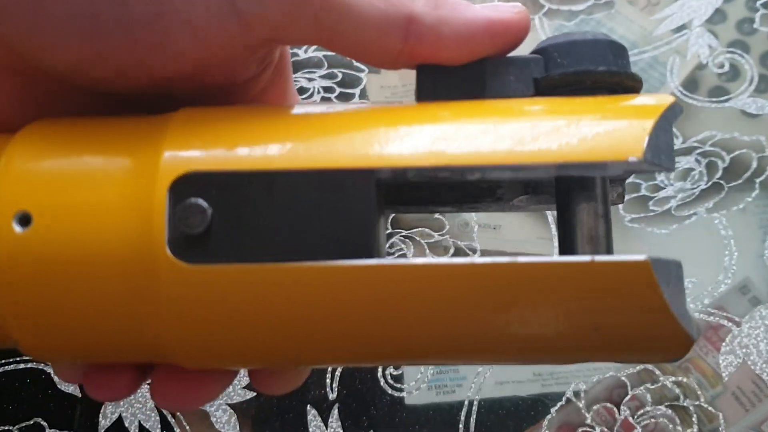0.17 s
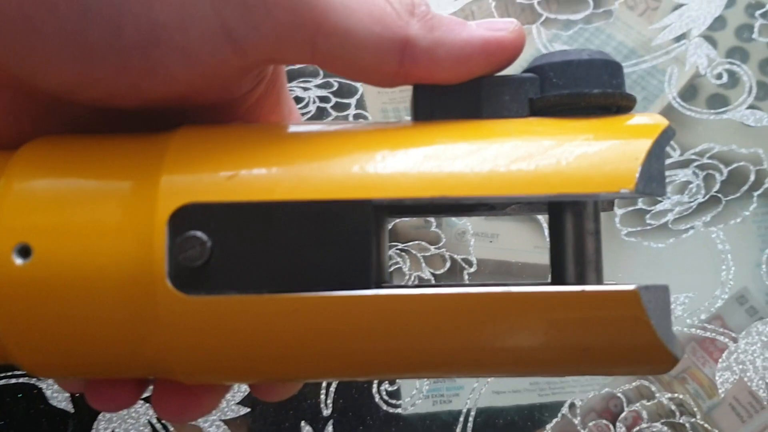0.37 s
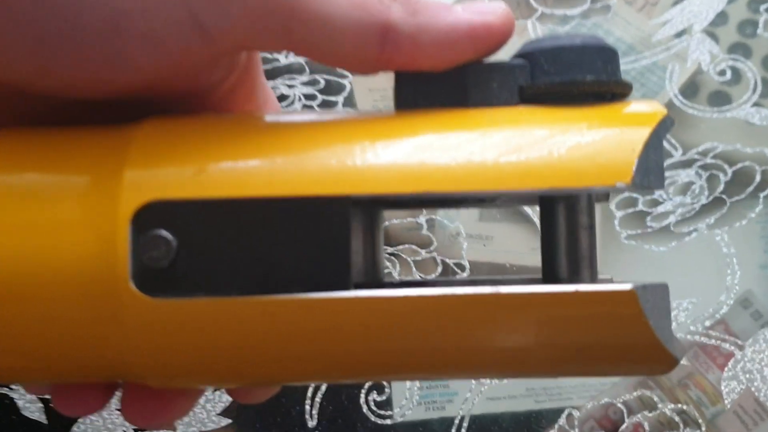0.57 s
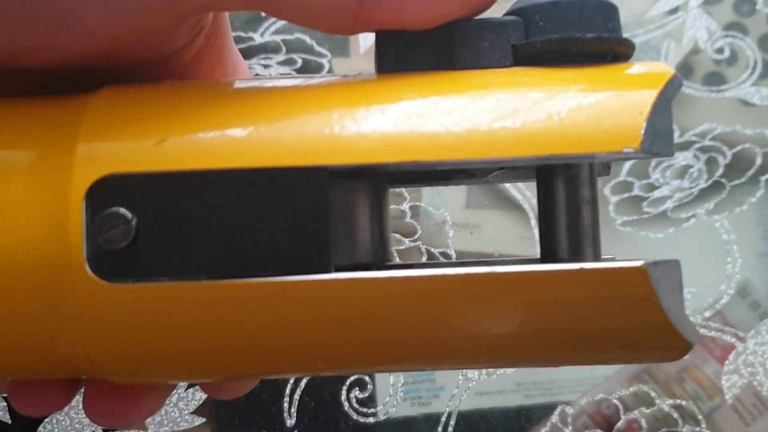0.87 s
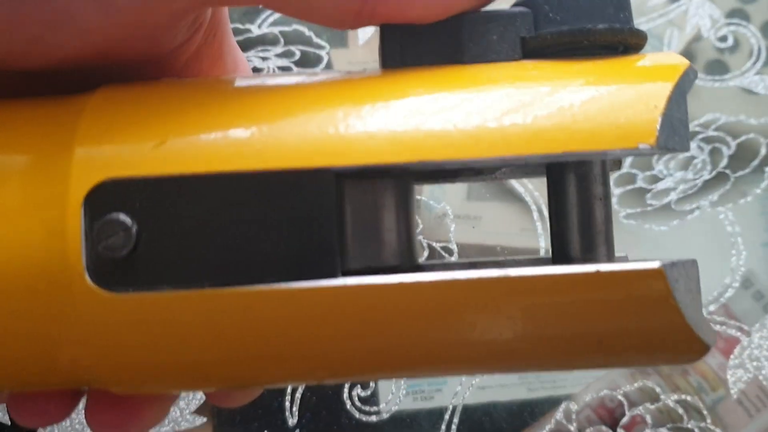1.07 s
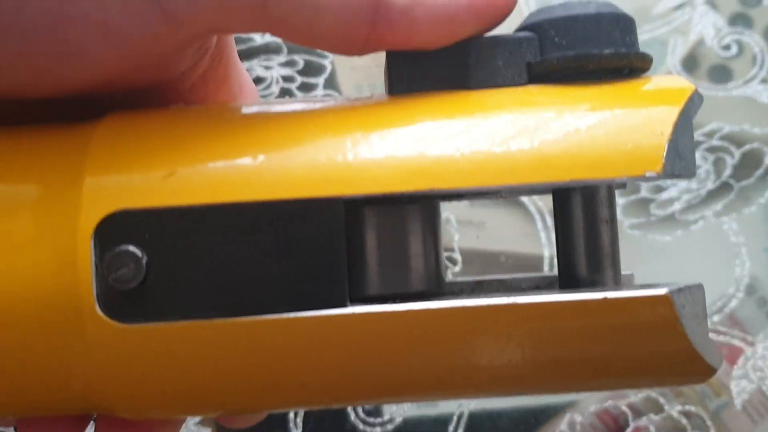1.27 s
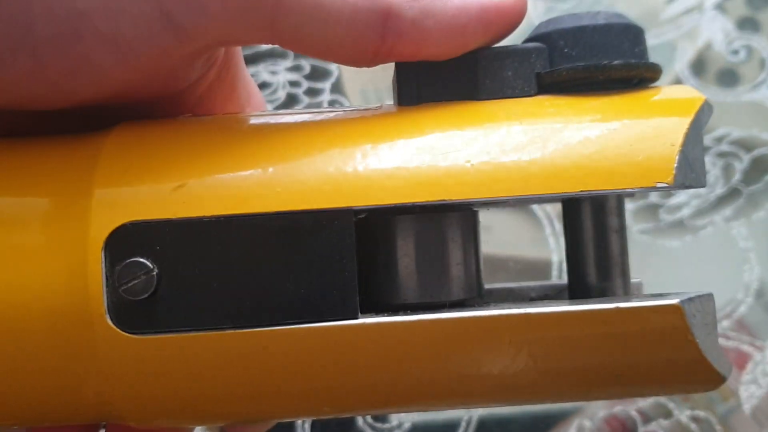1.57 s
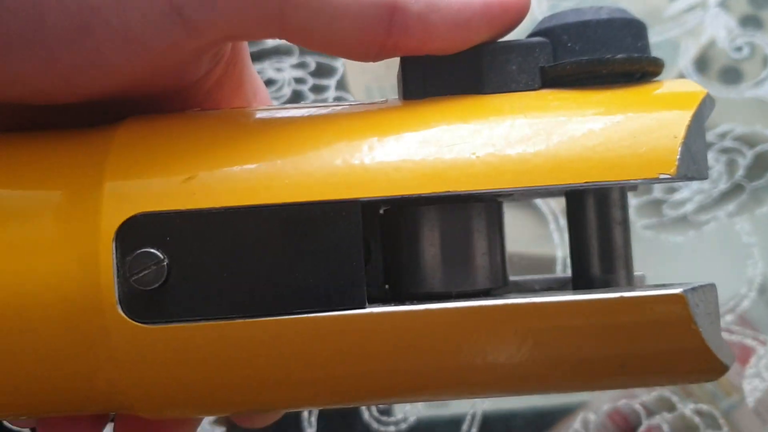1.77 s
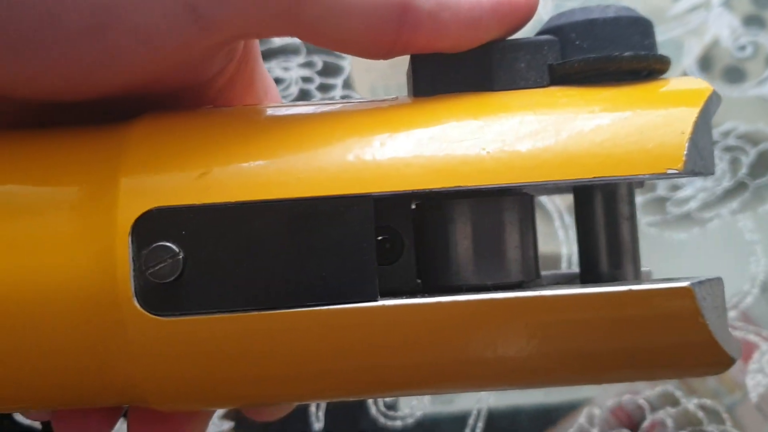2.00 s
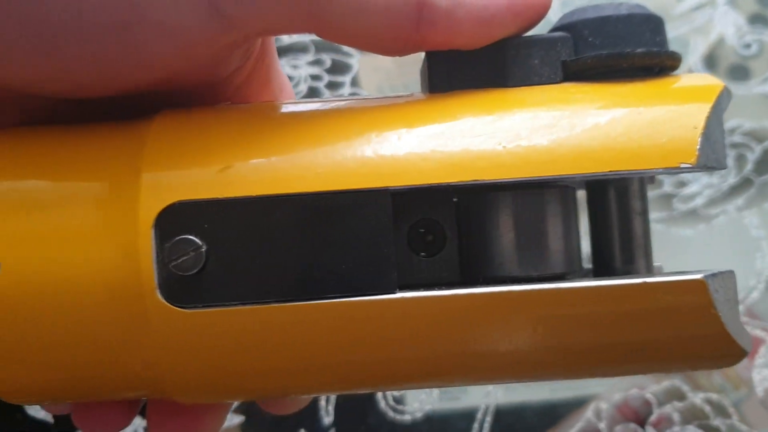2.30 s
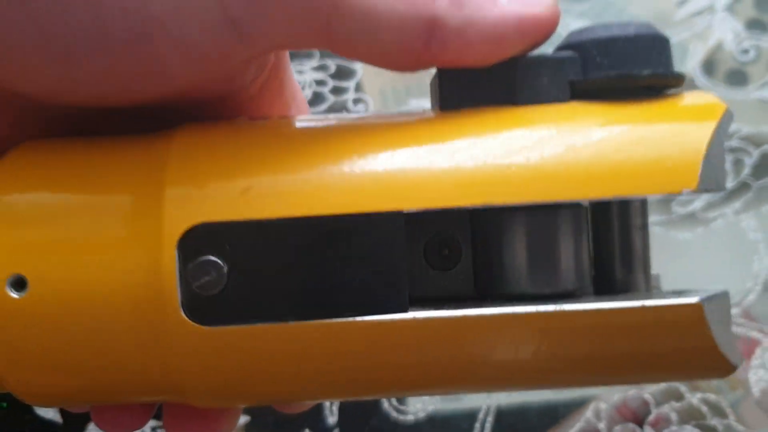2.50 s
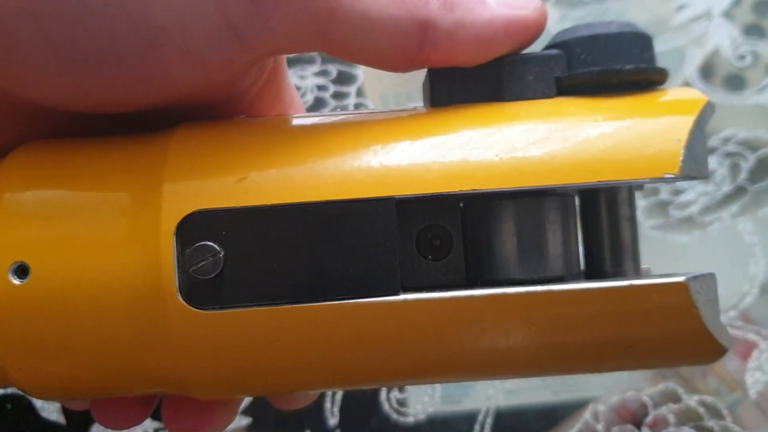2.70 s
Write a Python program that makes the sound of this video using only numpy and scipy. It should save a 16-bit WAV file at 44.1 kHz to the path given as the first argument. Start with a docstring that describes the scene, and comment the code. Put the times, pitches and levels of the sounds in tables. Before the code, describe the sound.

A handheld electric pressing tool runs close on the right in a quiet room. The trigger clicks at about 0.1 seconds, and the motor spins up with a brief squeal near 0.35. It whines, slowly rising in pitch, with grinding gears, rattling and hiss. At 2.5 seconds it brakes with a falling squeal, then clicks, kicks again more quietly around 2.6 and coasts until about 2.85.

```python
"""A trigger clicks, close on the right; then the mains motor of a hand-held pressing tool spins up and
drives the rollers through a gearbox. Gears grind and whine, the housing rattles, brushes hiss, the
cooling fan whines. At the end of the stroke the motor brakes with a falling squeal, kicks briefly
again and coasts. Faint room reflections and low room noise lie behind it."""
import sys
import numpy as np
from scipy import signal
from scipy.fft import rfft, irfft, next_fast_len
from scipy.io import wavfile
from scipy.ndimage import map_coordinates

SR = 44100
rng = np.random.default_rng(int(sys.argv[2]) if len(sys.argv) > 2 else 0)


def generate_wav(sig):
    """Save sig (samples, or channels by samples) to the path in sys.argv[1] as 16-bit PCM at SR."""
    pcm = np.round(np.clip(np.atleast_2d(sig).T, -1, 1) * 32767).astype(np.int16)
    wavfile.write(sys.argv[1], SR, pcm)


N = 125685
TIME_S = np.arange(N) / SR

# Spin-up and stroke (time [s], shaft speed [rev/s])
STROKE_RPS = [(.16, 5), (.25, 110), (.3, 178), (.332, 229), (.37, 272), (.4, 299), (.44, 327), (.5, 353),
              (.6, 379.5), (.75, 398.5), (1, 422), (1.22, 437.5), (1.5, 444), (1.8, 456), (2.05, 458.5),
              (2.34, 467.5), (2.458, 467)]
# Braking, second kick, coasting (time [s], shaft speed [rev/s])
RUN_OUT_RPS = [(2.476, 433), (2.51, 338), (2.55, 204), (2.57, 135), (2.598, 10), (2.615, 120), (2.635, 186),
               (2.66, 236), (2.69, 283), (2.725, 308), (2.85, 268)]
# Motor current (time [s], share of starting current [1])
CURRENT_SHARE = [(.17, 0.85), (.38, 0.99), (.47, 0.1), (1, 0.073), (2.45, 0.14), (2.6, 0.13), (2.63, 0.93),
                 (2.735, 0.83), (2.745, 0.12)]

# Gear grinding (time [s], level [dB])
GRIND_DB = [(.15, -78), (.162, -53), (.178, -52), (.19, -37.5), (.22, -21), (.26, -21), (.44, -16),
            (.48, -16), (1.3, -16), (2.46, -16), (2.52, -19.5), (2.565, -27.5), (2.588, -28.5), (2.6, -44),
            (2.64, -32), (2.69, -31), (2.735, -35.5), (2.745, -36.5), (2.85, -37.5)]
# Slack-tooth knocks (time [s], level [dB])
KNOCKS_DB = [(0.304, -14), (.433, -16), (0.4373, -16), (0.789, -13), (2.564, -27.5), (2.75, -32),
             (2.796, -30), (2.81, -32), (2.832, -32)]
# Tooth-mesh harmonics 1, 2, 3 (time [s], level [dB])
MESH_1_DB = [(.28, -78), (.37, -39.5), (.44, -25), (.48, -30.5), (.52, -35), (.7, -35.5), (1.1, -43.5),
             (1.65, -38.5), (2.45, -46), (2.66, -72), (2.71, -47), (2.85, -63)]
MESH_2_DB = [(.3, -60), (.6, -37), (1.55, -40), (1.8, -26), (2.05, -22.5), (2.42, -25.5), (2.5, -42),
             (2.6, -73), (2.66, -72), (2.69, -43), (2.73, -67), (2.85, -61)]
MESH_3_DB = [(.35, -47), (.375, -20), (.395, -24), (0.408, -17.5), (.44, -15), (.48, -37), (.55, -34),
             (2.45, -44), (2.6, -74)]
# Housing response (frequency [Hz], relative gain [dB])
HOUSING_DB = [(30, -48), (150, -31.5), (300, -26), (450, -17), (620, -20.5), (850, -13.5), (1200, -10.5),
              (1700, -8.5), (2300, -1.5), (3800, -3.5), (5500, -2.5), (6700, -4.5), (8000, -13),
              (9300, -27), (12000, -12.5), (16000, -18)]
# Housing resonances (centre [Hz], width [Hz], lift [dB])
HOUSING_MODES = [(870, 17, 1), (2342, 83, 2.34), (3248, 184, 6.9), (4330, 150, 6.8), (4874, 185, 4.7),
                 (6140, 370, 2.9)]
# Armature squeals (time [s], level [dB])
START_SQUEAL_DB = [(.3, -63), (.312, -30), (.322, -16), (.332, -9.5), (.352, -8), (.372, -12.5), (.4, -19),
                   (.425, -34), (.6, -31), (2.45, -36), (2.6, -70)]
BRAKE_SQUEAL_DB = [(.3, -70), (.6, -36), (2.44, -31), (2.472, -19), (2.5, -17.5), (2.52, -16.5),
                   (2.535, -23), (2.553, -26), (2.563, -53), (2.6, -78)]
# Housing rattle, strongest as the torque jerks (time [s], level [dB])
RATTLE_DB = [(.155, -72), (.163, -51), (.178, -43), (.19, -30), (.25, -17.5), (.31, -22), (.4, -27.5),
             (.8, -25.5), (2.45, -26.5), (2.565, -25.5), (2.59, -34), (2.602, -42), (2.64, -38.5),
             (2.735, -33.5), (2.75, -45.5), (2.85, -46)]
# Rattling modes (centre [Hz], width [Hz], relative level [dB])
RATTLE_MODES = [(859, 123, -8.5), (1386, 345, -1.5), (1943, 280, -3), (2242, 190, 3.5), (3024, 350, -2),
                (4364, 200, -3.5), (6400, 370, -3.5)]
# Brush hiss (time [s], level [dB])
BRUSH_DB = [(.15, -72), (.18, -80), (.2, -41), (.23, -26), (.5, -25), (2.45, -28), (2.53, -27.5),
            (2.575, -38), (2.6, -56), (2.64, -46), (2.69, -36), (2.735, -38), (2.75, -44), (2.85, -45)]
# Brush spectrum (frequency [Hz], relative density [dB])
BRUSH_SPECTRUM_DB = [(300, -38), (2500, -18), (6500, -2.5), (9200, -1.5), (10500, -1.5), (12500, -2.5),
                     (14000, 10), (15200, 2), (16000, -9.5)]
# Fan tone (time [s], level [dB])
FAN_DB = [(.42, -63), (.49, -28.5), (.6, -38), (.75, -33.5), (1, -45), (1.1, -36), (1.45, -27),
          (1.75, -26.5), (2.3, -26.5), (2.46, -27.5), (2.49, -52), (2.6, -80)]
# Shaft harmonics at full speed and drive (order [1], level [dB])
SHAFT_ORDERS_DB = [(1, -45.5), (2, -52), (6, -47.5), (7, -40), (14, -41), (17, -37.5), (19, -48), (20, -69),
                   (23, -51), (24, -41), (31, -40), (33, -50)]
# Trigger and switch contacts (time [s], snap level [dB], ring level [dB])
CLICKS_DB = [(0.0613, -48, -74), (0.0656, -39.5, -53.5), (.153, -48, -78), (0.1549, -30.5, -66),
             (2.601, -34, -74)]
# Switch ring (frequency [Hz], relative level [dB], t60 [s])
SWITCH_MODES = [(848, -9, .2), (2250, 1, .05), (4102, -6, 0.27), (6358, -6, .08)]
# Snap spectrum (frequency [Hz], relative density [dB])
SNAP_SPECTRUM_DB = [(200, -17), (900, -2), (2300, -1), (4500, -3), (6300, 12), (9200, -16), (13500, 9),
                    (16000, -23)]
# Body rumble (frequency [Hz], relative density [dB])
RUMBLE_SPECTRUM_DB = [(20, -16), (60, -3.5), (100, -1), (200, -2.5), (400, 2), (700, -4), (2000, -38)]
# Room noise (frequency [Hz], relative density [dB])
ROOM_SPECTRUM_DB = [(20, -6), (60, 2), (120, 2), (250, -1), (450, -19), (1500, -16), (6000, -34),
                    (16000, -27)]
# Shading of the left side (frequency [Hz], gain [dB])
LEFT_SHADE_DB = [(50, 0.1), (200, -1), (450, -4), (800, -8), (1250, -4), (1800, -14), (2300, -18),
                 (3200, -23), (4400, -19), (5200, -24), (6500, -27), (7500, -21), (9000, -6), (10000, -11),
                 (12000, -15), (14000, -21), (16000, -22)]
# Left-right likeness (frequency [Hz], coherence [0-1])
COHERENCE = [(40, .75), (300, .9), (600, .85), (1200, .66), (5000, .6), (10000, .68), (14000, .45)]

FULL_RPS, MESH_PER_REV = 460, 2.546
RIPPLE_HZ, RIPPLE_PEAK_S = 100, .332


def gear_grind(turns, impact_db=-6, scatter_db=1.0, flutter_db=0.87):
    """Uneven tooth impacts and sliding friction ring the housing; slack teeth knock."""
    contacts = np.diff(np.floor(turns * MESH_PER_REV + .15 * wobble(700)), prepend=0) > 0
    impacts = contacts * rng.uniform(-0.92, 1, N) * amp(scatter_db * np.tanh(wobble(300)))
    friction = housing(rng.standard_normal(N))
    grind = unit(friction + amp(impact_db) * housing(impacts))
    knock_envelope = sum(amp(db) * decay(at_s, t60_s=0.018) for at_s, db in KNOCKS_DB)
    knocks = housing(rng.standard_normal(N)) * knock_envelope
    level_db = curve(GRIND_DB) + flutter_db * wobble(45) + 0.32 * wobble(9.87)
    return grind * amp(level_db) * mains_ripple(depth=0.12) + knocks


def gear_whine(turns):
    """Three tooth-mesh harmonics, each with its own swells."""
    return sum(tone(k * MESH_PER_REV * turns, curve(levels), rough_rad=0.12, waver_db=0.6)
               for k, levels in enumerate([MESH_1_DB, MESH_2_DB, MESH_3_DB], 1))


def armature_squeals(turns):
    """Heavy current: squeals at start and braking, commutator buzz in the second kick."""
    start = tone(12 * turns, curve(START_SQUEAL_DB), rough_rad=.15) * mains_ripple(depth=1.0)
    brake = tone(8 * turns, curve(BRAKE_SQUEAL_DB), rough_rad=.25)
    brake_octave = tone(16 * turns, level_db=-25.5, rough_rad=.8) * swell(2.542, 2.575)
    kick = tone(36 * turns, level_db=-42, rough_rad=4) * swell(2.6, 2.75)
    return start + brake + brake_octave + kick


def rattle(flutter_db=3):
    """Loose parts shake the housing; each mode flares on its own."""
    modes = np.zeros(N)
    for centre_hz, width_hz, db in RATTLE_MODES:
        bandpass = lambda hz: 1j * hz * width_hz / (centre_hz ** 2 - hz ** 2 + 1j * hz * width_hz)
        band = unit(filtered(rng.standard_normal(N), lambda hz: bandpass(hz) ** 2))
        modes += band * amp(db + flutter_db * np.tanh(wobble(90)))
    return unit(modes) * amp(curve(RATTLE_DB))


def fan_whine(turns):
    """Cooling fan: one tone locked to the shaft."""
    return radiated(tone(22 * turns, curve(FAN_DB), rough_rad=.15, waver_db=0.5))


def shaft_harmonics(turns, speed_rps, drive_db, speed_exponent=3.3):
    """Faint shaft orders grow with speed and drive."""
    gain_db = drive_db + speed_exponent * 20 * np.log10(speed_rps / FULL_RPS)
    return sum(tone(order * turns, db + gain_db, rough_rad=0.29) for order, db in SHAFT_ORDERS_DB)


def brush_hiss():
    """Sliding brushes: flickering noise, pulsed by the mains."""
    hiss = noise(BRUSH_SPECTRUM_DB)
    level_db = curve(BRUSH_DB) + 2.0 * wobble(900) + 0.56 * wobble(40.1)
    return hiss * amp(level_db) * mains_ripple(depth=0.32)


def switch_clicks():
    """Each contact: dry snap, short rattle, faint ring."""
    snap_envelope = sum(amp(db) * (decay(at_s, t60_s=0.0098) + amp(-29) * decay(at_s, t60_s=.12))
                        for at_s, db, _ in CLICKS_DB)
    ring = sum(amp(ring_db + mode_db) * decay(at_s, t60_s) * np.sin(2 * np.pi * hz * (TIME_S - at_s))
               for at_s, _, ring_db in CLICKS_DB for hz, mode_db, t60_s in SWITCH_MODES)
    return snap_envelope * noise(SNAP_SPECTRUM_DB) + ring


def body_rumble(drive_db, full_drive_db=-53):
    """Low noise of the body, following the drive."""
    return noise(RUMBLE_SPECTRUM_DB) * amp(full_drive_db + drive_db)


def run_out_hum(sag_hz_per_s=150):
    """A faint low note sags as the tool runs out."""
    pitch_hz = 262 - sag_hz_per_s * (TIME_S - 2.6)
    return tone(np.cumsum(pitch_hz) / SR, level_db=-63, rough_rad=.2, waver_db=0.5) * swell(2.57, 2.85)


def reflections(x, t60_s):
    """Diffuse return from table and room."""
    tail = rng.standard_normal(N) * decay(0.0024, t60_s)
    return signal.fftconvolve(x, tail / np.linalg.norm(tail))[:N]


def room_noise(common_db=-74.5):
    """Low background: a common part plus a weaker one per side."""
    common, left, right = (noise(ROOM_SPECTRUM_DB) for _ in range(3))
    return amp(common_db) * (common + .5 * np.array([left, right]))


def housing(x):
    """Vibration as the housing radiates it, rms 1."""
    lift_db = lambda hz: sum(db / (1 + ((hz - centre_hz) / width_hz) ** 2) ** 2
                             for centre_hz, width_hz, db in HOUSING_MODES)
    return unit(filtered(x, lambda hz: amp(log_interp(HOUSING_DB, hz) + lift_db(hz))))


def radiated(x, corner_hz=520):
    """High-pass: a small body radiates little bass."""
    return filtered(x, lambda hz: hz ** 4 / (hz ** 4 + corner_hz ** 4))


def mains_ripple(depth):
    """Torque pulses twice per mains cycle, deeper at high current."""
    swing = np.cos(2 * np.pi * RIPPLE_HZ * (TIME_S - RIPPLE_PEAK_S))
    share = np.clip(depth * curve(CURRENT_SHARE), 0, 1)
    return (1 + share * swing) / (1 + share / 2)


def tone(cycles, level_db, rough_rad, waver_db=2):
    """Sine with unsteady level and phase."""
    peak = np.sqrt(2) * amp(level_db + waver_db * wobble(34.83))
    return peak * np.sin(2 * np.pi * cycles + rough_rad * wobble(160))


def noise(spectrum_db):
    """Coloured noise, rms 1."""
    return unit(filtered(rng.standard_normal(N), lambda hz: amp(log_interp(spectrum_db, hz))))


def filtered(x, response):
    """Apply response(hz) by FFT."""
    size = next_fast_len(N + SR // 2)
    return irfft(rfft(x, size) * response(np.fft.rfftfreq(size, 1 / SR)), size)[..., :N]


def wobble(rate_hz):
    """Smooth random curve, rate_hz knots a second."""
    knots = rng.standard_normal(int(N * rate_hz / SR) + 4)
    return map_coordinates(knots, [np.arange(N) * rate_hz / SR])


def decay(start_s, t60_s):
    """Sudden onset, exponential fall."""
    age_s = TIME_S - start_s
    return (age_s >= 0) * amp(-60 * np.maximum(age_s, 0) / t60_s)


def swell(start_s, end_s):
    """Half-sine envelope."""
    return np.sin(np.pi * np.clip((TIME_S - start_s) / (end_s - start_s), 0, 1))


def curve(rows):
    """Time table to one value per sample."""
    return np.interp(TIME_S, *np.transpose(rows))


def log_interp(rows, hz):
    """Frequency table read on a log axis."""
    knots_hz, values = np.transpose(rows)
    return np.interp(np.log(hz + 1), np.log(knots_hz + 1), values)


def amp(db):
    """Decibels to gain."""
    return 10 ** (np.asarray(db) / 20)


def unit(x):
    """Scale to rms 1."""
    return x / np.sqrt(np.mean(x ** 2) + 1e-20)


def scene(left_lag_s=.00009):
    """Tool on the right; the left side is shaded, later and more diffuse."""
    speed_rps = curve(list(STROKE_RPS) + list(RUN_OUT_RPS))
    turns = np.cumsum(speed_rps * (1 + .0005 * wobble(20))) / SR
    drive_db = curve(GRIND_DB) - curve(GRIND_DB).max()
    tool = gear_grind(turns) + rattle() + radiated(gear_whine(turns) + armature_squeals(turns))
    tool += fan_whine(turns) + shaft_harmonics(turns, speed_rps, drive_db) + brush_hiss()
    tool += body_rumble(drive_db) + run_out_hum() + switch_clicks()
    shade = lambda hz: amp(log_interp(LEFT_SHADE_DB, hz))
    coherence = lambda hz: log_interp(COHERENCE, hz)
    left = filtered(tool, lambda hz: shade(hz) * coherence(hz) * np.exp(-2j * np.pi * hz * left_lag_s))
    diffuse = reflections(tool, t60_s=0.21)
    left += filtered(diffuse, lambda hz: shade(hz) * np.sqrt(1 - coherence(hz) ** 2))
    right = tool + amp(-18) * reflections(tool, t60_s=0.22)
    return np.array([left, right]) + room_noise()


def record(dry, top_hz=15850):
    """Soft clip at full scale, then band limit."""
    rounded = dry / (1 + dry ** 8) ** (1 / 8)
    return filtered(rounded, lambda hz: hz < top_hz)


dry = scene()
out = record(dry)
generate_wav(out)
```